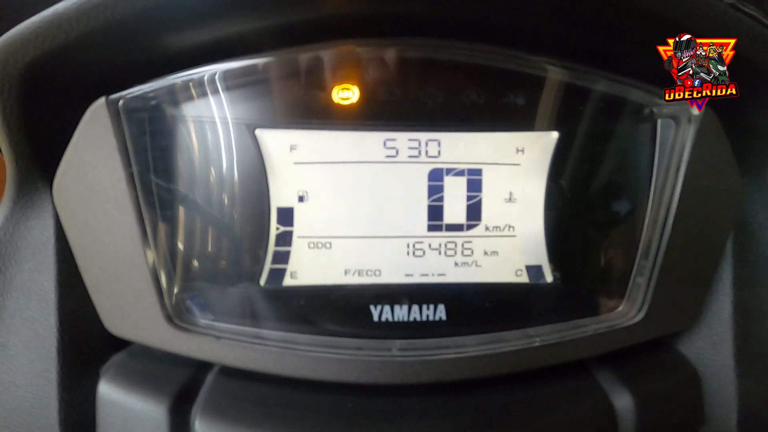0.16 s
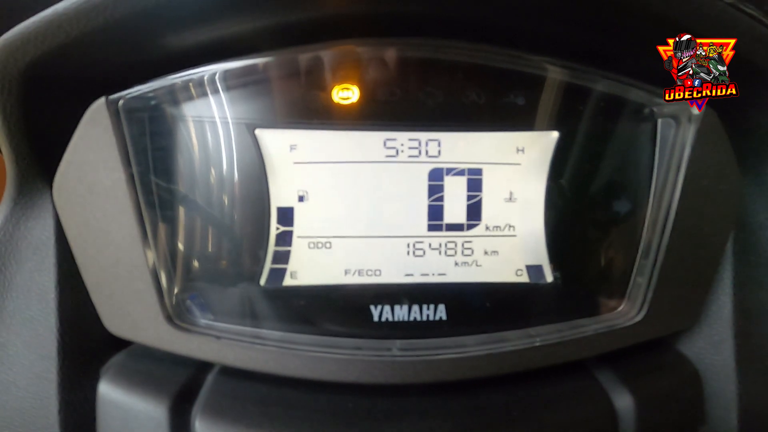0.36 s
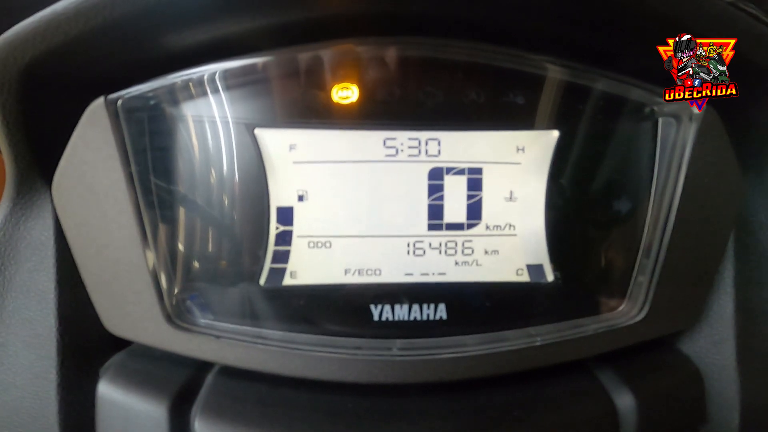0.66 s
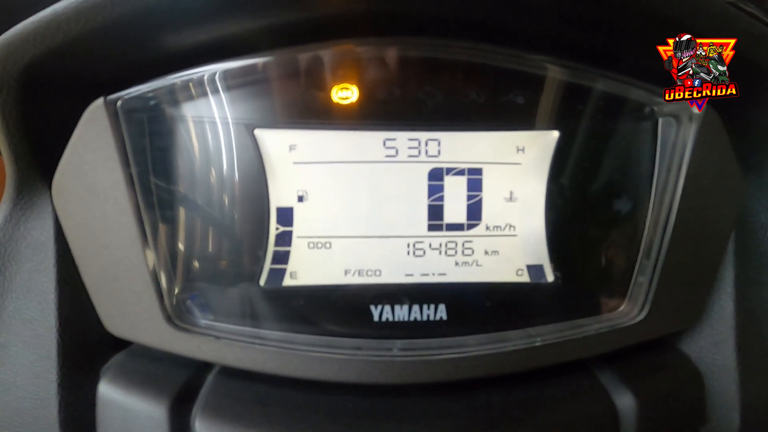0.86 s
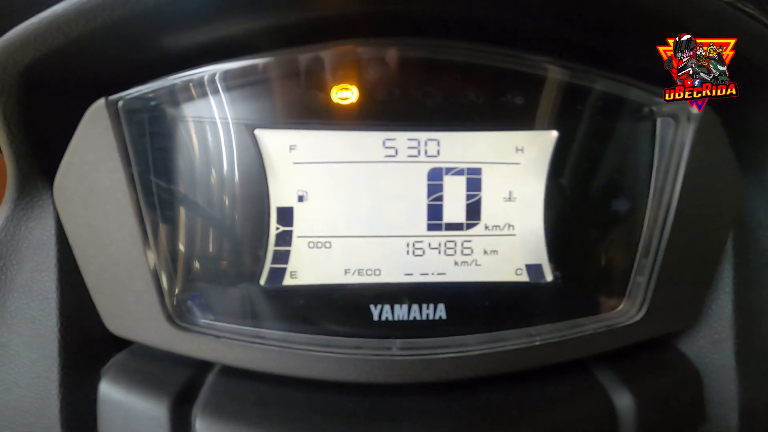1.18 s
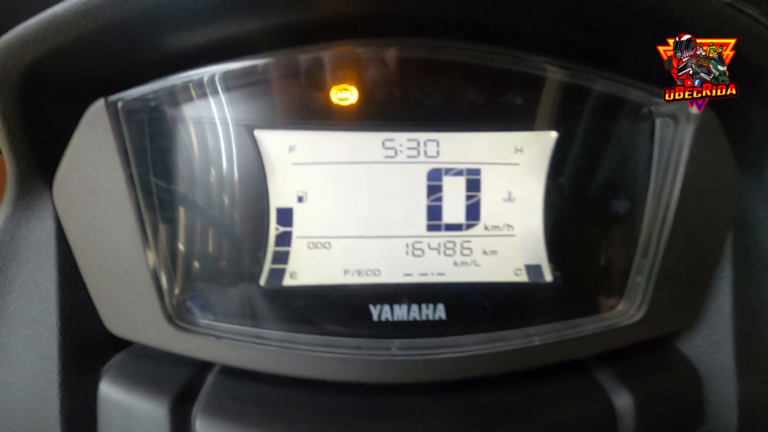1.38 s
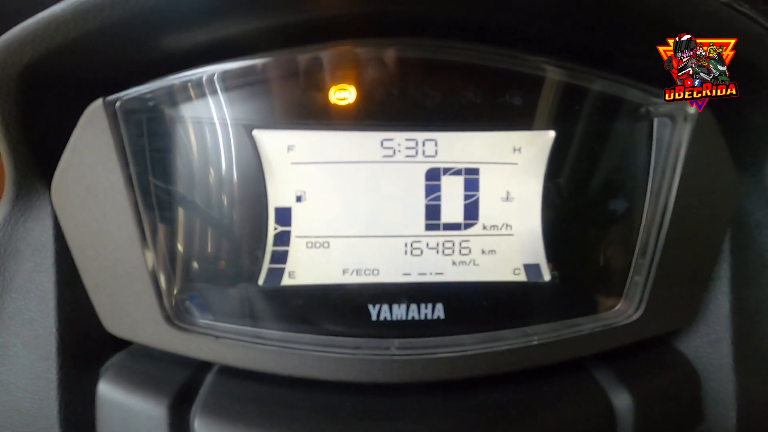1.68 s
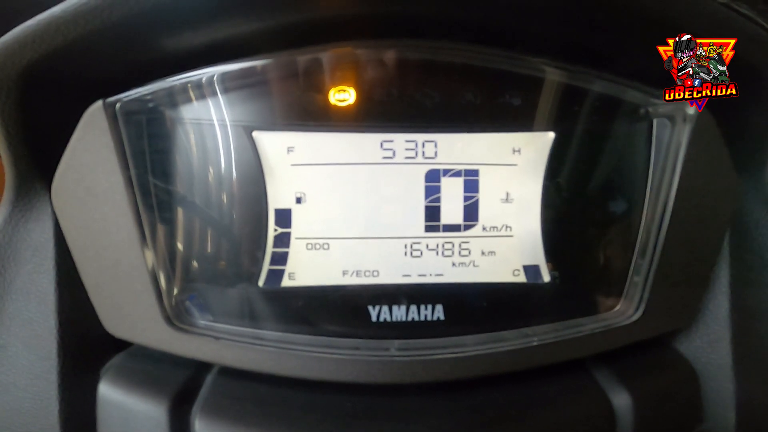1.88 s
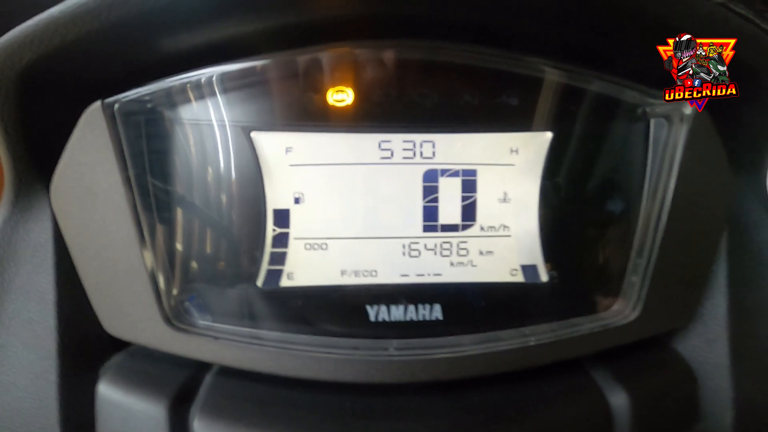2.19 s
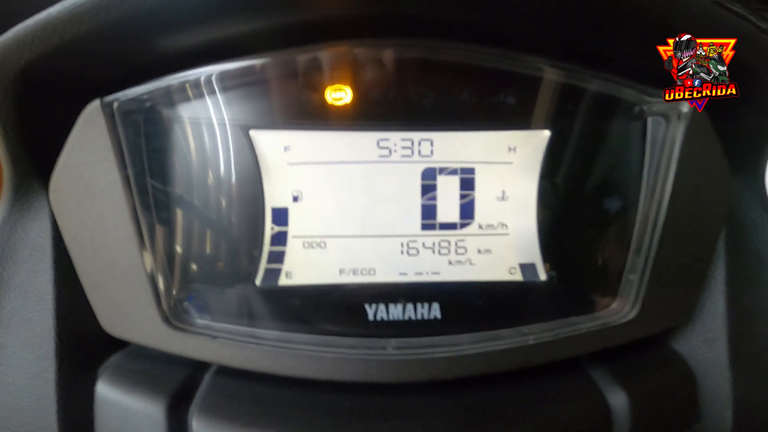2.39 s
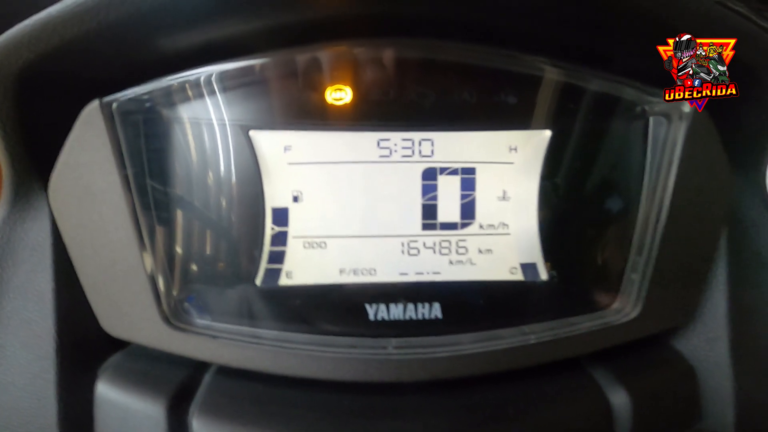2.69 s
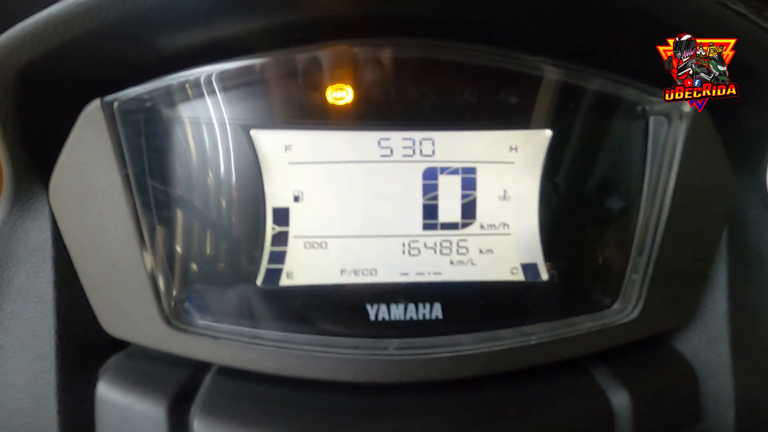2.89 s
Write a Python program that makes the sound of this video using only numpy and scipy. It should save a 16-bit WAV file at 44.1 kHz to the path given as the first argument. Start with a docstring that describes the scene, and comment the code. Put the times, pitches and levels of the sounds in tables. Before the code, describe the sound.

Scooter engine idling close by, a deep rapid putter with light mechanical clatter.

```python
"""At the handlebar of an idling single-cylinder four-stroke scooter, about 14.5 firings a second.
Every cycle booms once in the muffler and once in the airbox, with a shudder of body panels between.
The crank speeds up after each firing and sags before the next, so the chain and gear whines warble.
Valve-gear clatter and the cooling fan's rush lie on top; a midrange growl swells and fades,
and two faint ticks come late."""
import sys
import numpy as np
from scipy.fft import rfft, irfft, next_fast_len
from scipy.io import wavfile
from scipy.ndimage import map_coordinates

SR = 44100
rng = np.random.default_rng(int(sys.argv[2]) if len(sys.argv) > 2 else 0)


def master(y):
    """Save y as 16-bit WAV."""
    cut = np.clip(np.atleast_2d(y).T, -1, 1)
    pcm = np.round(cut * 32767)  # scale
    wavfile.write(sys.argv[1], SR, pcm.astype(np.int16))


N = 134505
TIME = np.arange(N) / SR


def amp(db):
    """Decibels to gain."""
    return 10 ** (np.asarray(db) / 20)


def unit(x):
    """Scale to rms 1."""
    return x / np.sqrt(np.mean(x ** 2) + 1e-20)


def along(points, hz):
    """Read a curve of (Hz, value) points on a log frequency axis."""
    freqs, values = np.transpose(points)
    return np.interp(np.log(hz + 1), np.log(freqs + 1), values)


def fader(points):
    """A gain ride through (seconds, dB) points."""
    return amp(np.interp(TIME, *np.transpose(points)))


def wobble(rate):
    """A smooth random curve, rate knots a second."""
    return map_coordinates(rng.standard_normal(1024), [TIME * rate], mode="wrap")


def filtered(x, response):
    """Equalise x with a gain given as a function of Hz."""
    size = next_fast_len(N + SR // 2)
    return irfft(rfft(x, size) * response(np.fft.rfftfreq(size, 1 / SR)), size)[..., :N]


def panned(db):
    """Left and right gains for a left-minus-right level difference."""
    return amp(np.array([[.5], [-.5]]) * db)


def airborne(pair, spectrum):
    """Two noises coloured by a spectrum and the ringing casing, spread over both ears; rms 1."""
    # Casing resonances. Each row: frequency in Hz, width in Hz, lift in dB.
    casing = [(1525, 50, 3), (1857, 30, 3), (2540, 45, 3), (2670, 50, 4), (3036, 35, 4), (3397, 45, 4),
              (4094, 60, 4), (5135, 45, 4)]
    # Stereo width. Each row: frequency in Hz, left-right correlation.
    likeness = [(100, 0.52), (500, 0.91), (1000, 0.76), (1600, 0.38), (2500, 0.34), (5000, .25), (9000, 0)]
    # Stereo balance. Each row: frequency in Hz, left minus right in dB.
    balance = [(250, -2.5), (500, -2.5), (1000, -1), (2000, 1.4), (4000, -0.4), (9000, -4)]

    def mid_side_gains(hz):
        lift_db = sum(db / (1 + (2 * (hz - centre) / width) ** 2) for centre, width, db in casing)
        spread = np.arccos(np.clip(along(likeness, hz), -1, 1)) / 2
        return amp(along(spectrum, hz) + lift_db) * [np.cos(spread), np.sin(spread)]

    mid, side = filtered(pair, mid_side_gains)
    ears = np.array([mid + side, mid - side])
    return unit(filtered(ears, lambda hz: panned(along(balance, hz))))


def fan():
    """The bed: a steady, barely wavering rush of cooling air and running machinery."""
    # Colour of the rush. Each row: frequency in Hz, relative noise density in dB.
    spectrum = [(20, -17), (60, -11), (130, -11), (165, -1.5), (300, -4.5), (350, -7.5), (420, -0.5),
                (520, -0.5), (620, -9.5), (800, -16), (1050, -7), (1280, -18.5), (1600, -14.5),
                (2100, -22.5), (2600, -22), (4000, -26), (5300, -27.5), (6400, -35.5), (7800, -38),
                (9000, -44.5), (12200, -52.5), (15500, -70.5)]
    level_db = -28 + .33 * wobble(rate=12)
    return amp(level_db) * airborne(rng.standard_normal((2, N)), spectrum)


def growl():
    """A rough midrange noise swells about a second in and fades away."""
    # Colour of the growl. Each row: frequency in Hz, relative noise density in dB.
    spectrum = [(100, -35), (250, -5.5), (380, 1.5), (500, -3), (680, 3.5), (850, -4.5), (1400, -9),
                (2200, -31.5), (8000, -61.5)]
    # Its swell. Each row: time in seconds, level in dB.
    swell = [(0, -43), (.4, -37), (.7, -41), (1.08, -34), (1.4, -38.5), (1.8, -38), (2.2, -44.5),
             (3.05, -47)]
    return fader(swell) * airborne(rng.standard_normal((2, N)), spectrum)


def ticks():
    """Tiny dry ticks high in the treble, off to the right."""
    # Tick cues. Each row: start in seconds, relative level in dB.
    cues = [(2.133, -43), (2.695, -36)]
    decay_s, low_cut_hz = .0002, 8500
    envelope = sum(amp(db) * (TIME >= at) * np.exp(-np.abs(TIME - at) / decay_s) for at, db in cues)
    snaps = envelope * rng.standard_normal(N)
    return filtered(snaps, lambda hz: 1 / (1 + (low_cut_hz / (hz + 1)) ** 4)) * panned(db=-10)


def valve_clatter(cycle):
    """The valve gear strikes short noisy knocks at the same places in every cycle."""
    # Valve knocks. Each row: delay after the firing in cycles, relative level in dB.
    knocks = [(0.022, -37.5), (.27, -40.5), (.5, -38.5)]
    # Colour of the knocks. Each row: frequency in Hz, relative noise density in dB.
    spectrum = [(150, -26.5), (300, -3), (500, -2), (800, -25), (1050, -2), (1300, -15.5), (3000, -19.5),
                (5300, -20), (8000, -37.5), (15000, -66.5)]
    decay_s, scatter_db = .009, 1.5
    firing_hz = np.gradient(cycle) * SR
    envelope = 0
    for delay, db in knocks:
        age_s = ((cycle - delay) % 1) / firing_hz
        envelope += amp(db + scatter_db * wobble(rate=30)) * np.exp(-age_s / decay_s)
    level = np.sqrt(np.mean(envelope ** 2))
    return level * airborne(envelope * rng.standard_normal((2, N)), spectrum)


def gear_whines(cycle):
    """Teeth mesh at the crank's uneven speed, swelling each turn, fluttering as the chain slackens."""
    # Chain and gear tones. Each row: multiple of the firing rate (rounded in use), relative level
    # in dB, flutter in dB, phase wander in radians, swing delay in cycles, swing per crank turn
    # in dB (negative dips at that delay), trend in dB per second.
    tones = [(35, -32.5, 1.5, 0.48, 0.044, -3, 1), (72.27, -37, 4.4, 0.55, 0, 1, -1.7),
             (69.2, -40, 3, .45, 0.017, 3.5, 0.3), (73.58, -41.5, 2, .45, .02, -1.5, 2.2)]
    speed_swing, fastest_at = .026, .24  # share of the speed, cycles after the firing
    flutter_per_s = 45
    cycle_angle = 2 * np.pi * cycle + speed_swing * np.sin(2 * np.pi * (cycle - fastest_at))
    whine = 0
    for teeth, db, flutter_db, wander, delay, swing_db, trend_db in tones:
        swing = np.cos(2 * np.pi * 2 * (cycle - delay))  # two crank turns a cycle
        load = amp(trend_db * TIME + flutter_db * wobble(flutter_per_s) + swing_db * swing)
        mesh = np.sin(np.round(teeth) * cycle_angle + wander * wobble(flutter_per_s))
        whine += amp(db) * unit(load * mesh)
    return whine * panned(db=-2)


def stroke(cycle, modes):
    """One soft puff per cycle rings a set of resonances."""
    jitter_s, scatter_db, puff_top_hz = .00008, .2, 620
    lead = SR // 2  # pre-roll: the engine is already running at the start
    cycle = np.r_[cycle[0] + np.arange(-lead, 0) * (cycle[1] - cycle[0]), cycle]
    onsets = np.flatnonzero(np.diff(np.floor(cycle)))
    late, strength = rng.standard_normal((64, 2))[:len(onsets)].T
    onsets = np.clip(np.round(onsets + late * jitter_s * SR).astype(int), 0, None)
    pulses = np.bincount(onsets, amp(scatter_db * strength))
    size = next_fast_len(N + 2 * lead)
    hz = np.fft.rfftfreq(size, 1 / SR)
    puffs = rfft(pulses, size) * np.exp(-(hz / puff_top_hz) ** 2)
    ring = sum(polarity * amp(db) * 1j * hz * width / (centre ** 2 - hz ** 2 + 1j * hz * width)
               for centre, width, db, polarity in modes)
    return irfft(puffs * ring, size)[lead:lead + N]


def engine_thump(cycle):
    """The exhaust booms in the muffler, the panels shudder, then the intake gulps through the airbox."""
    # Resonances of the muffler, the body panels and the airbox.
    # Each row: frequency in Hz, width in Hz, relative level in dB, polarity.
    muffler = [(68.3, 7.15, -23.5, 1), (89.14, 17.5, -21, 1), (124.27, 9.78, -12.5, -1),
               (132.5, 8.5, -24.5, 1)]
    panels = [(175.7, 13.7, -33.5, -1), (163.2, 80, -35.5, 1), (246.4, 12, -36.5, -1),
              (308.2, 19.7, -36, -1)]
    airbox = [(53.5, 21.2, -21.5, 1), (74.8, 26.4, -26, -1), (123.9, 3.3, -22, -1)]
    # Weight of the firings. Each row: time in seconds, level in dB.
    weight = [(0, -9), (.6, -8), (1.6, -8.5), (2.2, -9), (3.05, -10)]
    panel_lag, intake_lag = .124, .461  # cycles after the exhaust pulse
    boom = stroke(cycle, muffler)
    shudder = stroke(cycle - panel_lag, panels)
    gulp = stroke(cycle - intake_lag, airbox)
    return fader(weight) * unit(boom + shudder + gulp) * panned(db=-3)


def scene():
    """The engine's cycle drives thump, whines and clatter over the fan, the growl and the ticks."""
    # The drifting idle. Each row: time in seconds, firings per second.
    idle_speed = [(0.0, 15.477), (0.27, 15.272), (0.48, 14.579), (0.66, 14.431), (0.9, 14.612),
                  (1.2, 14.783), (1.38, 14.473), (1.62, 14.792), (1.74, 15.199), (1.84, 14.4),
                  (1.97, 14.527), (2.15, 14.18), (2.45, 14.136), (2.7, 13.938), (3.05, 14.238)]
    # Fader ride on whines and clatter. Each row: time in seconds, gain in dB.
    machinery_ride = [(0, -4), (1.05, -0.4), (2.2, -1.9), (3.05, -2)]
    first_firing = .291  # cycles before the first exhaust pulse
    firing_hz = np.interp(TIME, *np.transpose(idle_speed))
    cycle = np.cumsum(firing_hz) / SR - first_firing
    machinery = fader(machinery_ride) * (gear_whines(cycle) + valve_clatter(cycle))
    return engine_thump(cycle) + machinery + fan() + growl() + ticks()


def record(dry):
    """The microphone thins the deepest bass; the recorder rounds the peaks and cuts the very top."""
    low_cut_hz, ceiling, top_hz = 27, 1.05, 15800
    thinned = filtered(dry, lambda hz: 1 / (1 + (low_cut_hz / (hz + 1)) ** 6))
    rounded = thinned / (1 + np.abs(thinned / ceiling) ** 10) ** (1 / 10)
    return filtered(rounded, lambda hz: hz < top_hz)


dry = scene()
out = record(dry)
master(out)
```